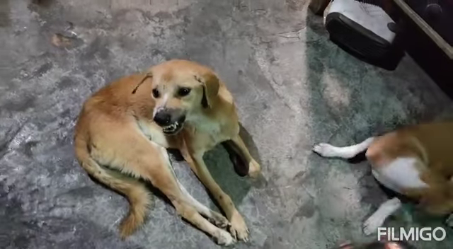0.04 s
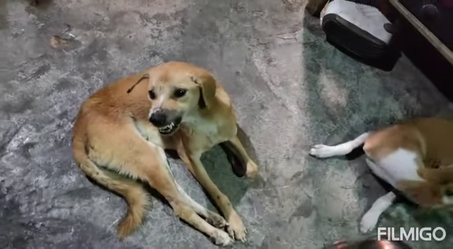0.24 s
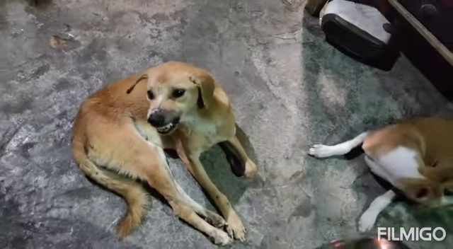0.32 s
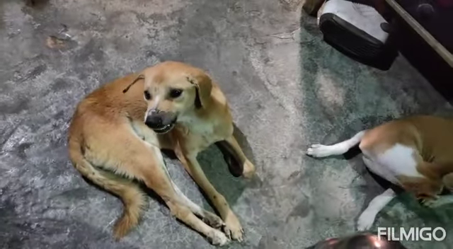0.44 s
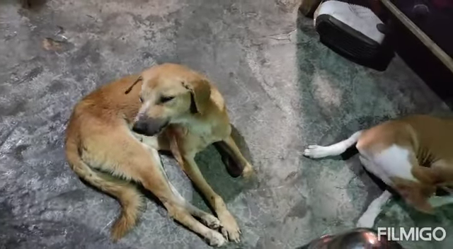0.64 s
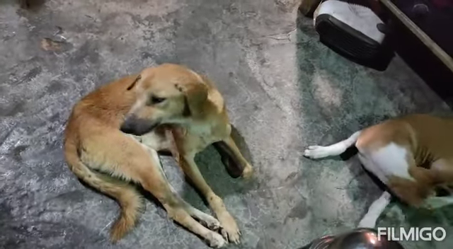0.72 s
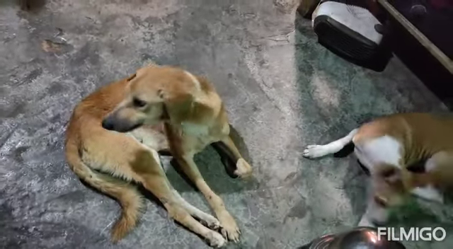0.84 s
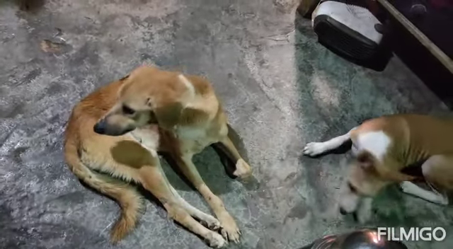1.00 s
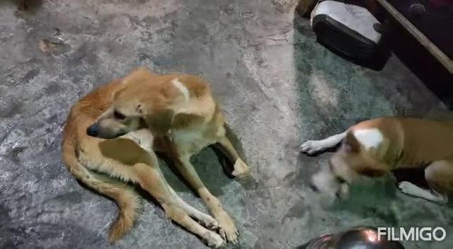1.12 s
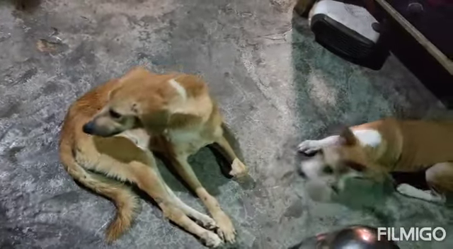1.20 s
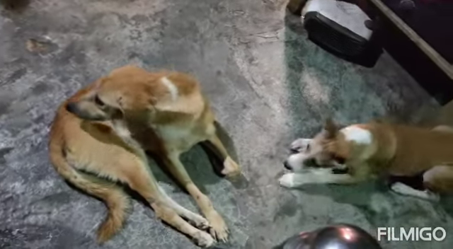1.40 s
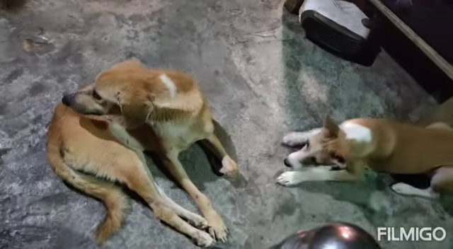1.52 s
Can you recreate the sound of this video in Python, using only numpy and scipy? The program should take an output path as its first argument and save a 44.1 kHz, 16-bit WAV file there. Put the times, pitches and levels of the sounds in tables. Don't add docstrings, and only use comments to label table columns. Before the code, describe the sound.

A dog gives one short, low, rough warning growl close by in a quietly humming room.

```python
import sys
import numpy as np
from scipy import signal
from scipy.fft import rfft, irfft, next_fast_len
from scipy.io import wavfile
from scipy.ndimage import uniform_filter1d, map_coordinates

SR = 44100
rng = np.random.default_rng(int(sys.argv[2]) if len(sys.argv) > 2 else 0)


def output_pcm(signal):
    pcm = np.clip(np.atleast_2d(signal).T, -1, 1) * 32767
    wavfile.write(sys.argv[1], SR, np.round(pcm).astype(np.int16))


def how_loud(loudness_db):
    steps = np.asarray(loudness_db, float) / 20
    return 10 ** steps


N = 68355
HUM_EDGE_HZ = 1009

# (t/s, flap rate/Hz, unevenness/0-1)
FOLD_BEATS = [
    (.245, 70, .02),
    (.28, 78, .03),
    (.33, 127, .1),
    (.58, 123, .08),
    (.655, 92, .03),
    (.73, 88, .03),
    (.75, 79, .05),
    (.81, 77, .04),
    (.82, 66, .04),
]


def unit(x):
    return x / np.sqrt(np.mean(x ** 2) + 1e-20)


def along(points, hz):
    f, v = np.transpose(points)
    return np.interp(np.log(hz + 1), np.log(f + 1), v)


def curves(rows):
    s, *cols = np.transpose(rows)
    return [np.interp(np.arange(N) / SR, s, c) for c in cols]


def ramp(start_s, end_s):
    return np.interp(np.arange(N) / SR, [start_s, end_s], [0, 1])


def wobble(rate):
    return map_coordinates(rng.standard_normal(400), [np.arange(N) * rate / SR])


def filtered(x, response):
    m = next_fast_len(N + SR // 2)
    return irfft(rfft(x, m) * response(np.fft.rfftfreq(m, 1 / SR)), m)[..., :N]


def rings(peaks, power=1):
    def response(f):
        total = 0
        for k, (centre, width, db) in enumerate(peaks):
            peak = 1j * f * width / (centre ** 2 - f * f + 1j * f * width)
            total = total + (-1) ** k * how_loud(db) * peak ** power
        return total
    return response


def rush(response, alike, patchy_db):
    z = signal.stft(rng.standard_normal((2, N + 512)), nperseg=512)[2]
    field = uniform_filter1d(rng.standard_normal(z.shape[1:]), size=5, axis=0)
    field = uniform_filter1d(field, size=12, axis=1)
    pair = signal.istft(z * how_loud(patchy_db * unit(field)), nperseg=512)[1][:, :N]

    def spread(hz):
        turn = np.arccos(np.clip(along(alike, hz), -1, 1)) / 2
        return response(hz) * [np.cos(turn), np.sin(turn)]
    mid, side = filtered(pair, spread)
    return unit(np.array([mid + side, mid - side]))


def whines():
    # (f/Hz, level/dB)
    motors = [(296.1, -76), (371.4, -78), (403.7, -75.5), (484.5, -77), (549.1, -77), (839.8, -79)]
    wander_hz, wander_db = 3, 2.5
    out = 0
    for hz, db in motors:
        phase = 2 * np.pi * np.cumsum(hz + wander_hz * wobble(12)) / SR
        out = out + how_loud(db + 2.5 + wander_db * wobble(9)) * np.sin(phase)
    return out


def room():
    # (f/Hz, density/dB per Hz)
    hum_colour = [(30, -23.5), (45, -5), (110, 1.5), (330, -7.5), (520, -6.5), (680, -9.5), (860, -5.5),
                  (1000, -16.5)]
    # (f/Hz, likeness/0-1)
    hum_alike = [(60, 1), (240, 0.92), (950, 0.48), (3770, 0.011), (15000, 0.06)]
    # (f/Hz, density/dB per Hz)
    hiss_colour = [(1000, -2.5), (1500, 0), (3000, -2.5), (4300, -15), (8000, -10.5), (15600, -30.5)]
    hum_db, drone_db, hiss_db = -60.5, -67, -93
    fall_db = 69.5

    def hum_response(f):
        octaves_above = np.log2(np.maximum(f / HUM_EDGE_HZ, 1))
        return how_loud(along(hum_colour, f) - fall_db * octaves_above)
    hum = rush(hum_response, hum_alike, patchy_db=0.5)
    drone = rush(lambda f: abs(rings([(46, 8, 0)], power=2)(f)), [(46, .985)], patchy_db=-3.5)
    hiss = rush(lambda f: how_loud(along(hiss_colour, f)) * (f > 900), [(2000, 0.18)], patchy_db=-4)
    return how_loud(hum_db + 2.0 * wobble(6.11)) * hum + how_loud(drone_db) * drone + how_loud(hiss_db) * hiss + whines()


def leaks():
    # (t/s, length/s, f/Hz, width/Hz, level/dB)
    openings = [(.02, .25, 2500, 260, -89), (.06, .14, 1532, 110, -87), (0.146, .08, 2180, 430, -82),
                (.065, .07, 4650, 600, -78), (.68, .2, 3750, 500, -83), (.76, .28, 8500, 1100, -91),
                (.82, .1, 5170, 700, -84), (.89, .12, 2550, 350, -88), (.95, .07, 5000, 700, -87),
                (1.04, .08, 1815, 330, -77), (1.045, .07, 1384, 140, -79), (1.032, .13, 3450, 350, -81),
                (1.1, .2, 3200, 260, -83), (1.1, .34, 4800, 300, -87.5), (1.17, .3, 4480, 260, -88),
                (1.2, .12, 1194, 150, -89), (1.26, .1, 2700, 700, -94), (1.4, .07, 2550, 230, -87),
                (1.41, 0.054, 3970, 150, -96), (1.485, .12, 4300, 200, -90)]
    t, out = np.arange(N) / SR, 0
    for s, length, hz, width, db in openings:
        opening = (t - s) / 0.03
        closing = (s + length - t) / (0.4 * length + .02)
        gate = np.clip(np.minimum(opening, closing) + .5, 0, 1) ** 2
        band = rings([(hz, width, 0)], power=3)
        out = out + how_loud(db) * gate * rush(lambda f: abs(band(f)), [(2000, 0.22)], patchy_db=4.5)
    return out * how_loud([[4], [-4]])


def scuffs():
    # (peak t/s, rise/s, fall/s per 20 dB, level/dB, brightness: 5 dB per octave each above 7 kHz; its
    # size also thins the band below 5.5 kHz by 2.3 dB per octave each)
    rubs = [(.1, 0.049, 0.6, -76.5, 2), (0.186, 0.067, 0.14, -65, 0.66), (.28, 0.082, 0.23, -71, -4),
            (0.381, 0.073, 0.15, -60.5, -2.6), (.5, 0.2, 0.2, -71, -8), (0.661, 0.072, 0.15, -71.5, -12),
            (.84, 0.057, 0.12, -79, 0), (.98, 0.051, 0.27, -81.5, 1), (1.064, 0.02, 0.21, -72, 1.53),
            (1.171, 0.049, 0.08, -76.5, -1), (1.279, 0.09, 0.16, -81, 1), (1.439, 0.086, 0.23, -74, 1.5)]
    # (f/Hz, density/dB per Hz)
    fur_colour = [(2500, -46.5), (3800, -18), (4500, -11.5), (6200, -5), (6800, -0.5), (7300, -6),
                  (10000, -15.5), (15600, -27.5)]
    left_db = 6
    t, out = np.arange(N) / SR, 0
    for s, rise, fall, db, bright_db in rubs:
        def colour(f):
            low_loss = 2.3 * abs(bright_db) * (f < 5500) * np.log2(5500 / (f + 1))
            high_gain = 5.0 * bright_db * (f > 7000) * np.log2((f + 1) / 7000)
            return how_loud(along(fur_colour, f) - low_loss + high_gain)
        swell_db = -20 * np.where(t < s, (s - t) / rise, (t - s) / fall) ** 1.75
        grain = rush(colour, [(6000, 0.23)], patchy_db=3.0)
        out = out + how_loud(db + swell_db + 0.9 * wobble(90)) * grain
    return out * how_loud([[left_db / 2], [-left_db / 2]])


def folds():
    scatter_db, slap_s, puff_s = 2.2, .00025, .003
    octave_db, settle_s = 0, .656
    rate_hz, uneven = curves(FOLD_BEATS)
    phase = np.cumsum(rate_hz * (np.arange(N) > .2465 * SR)) / SR
    slip = (phase[round(settle_s * SR)] + .5) % 1 - .5
    phase = phase - slip * ramp(.35, .6)
    at = np.flatnonzero(np.diff(np.floor(phase + 1 - 1e-6)) > 0)
    luck = rng.standard_normal((200, 2))[:len(at)]
    size = how_loud(scatter_db * np.clip(luck[:, 1], -2, 2) * np.clip(10 * uneven[at], .5, 1))
    moved = np.clip(at + luck[:, 0] * uneven[at] * SR / rate_hz[at], 0, N - 1).astype(int)
    flaps = np.bincount(moved, size, N)
    t = np.arange(900) / SR
    gate = signal.fftconvolve(flaps, t * np.exp(-t / puff_s))[:N]
    slap = signal.fftconvolve(flaps, t * np.exp(-t / slap_s))[:N]
    puff = gate * rng.standard_normal(N)
    turn = 2 * np.pi * np.interp(np.arange(N), np.sort(moved), np.arange(len(at)))
    root = np.sin(turn)
    slowness = np.clip((105 - rate_hz) / 15, 0, 1)
    tone = root + how_loud(octave_db) * slowness * np.sin(2 * turn)
    return slap, puff, unit(tone), root


def growl():
    # (t/s, level/dB, nose ring/dB, mouth ring/dB, bare flap tone/dB)
    effort = [
        (.24, -74, -4, -2, -19),
        (.247, -48, 4, -5, 3),
        (.3, -42.5, 2, 1, -5),
        (.56, -44, 0, 0.5, -2),
        (.63, -44.5, -2.5, -1.5, -4),
        (.7, -45.5, -2.5, 6, -10),
        (.77, -46.5, -3, 0, -14),
        (.885, -48.5, -5, -5, -15),
        (.915, -62.5, -8, -10, -15),
    ]
    # (t/s, half length/s, loss/dB, further nose loss/dB)
    catches = [
        (0.333, 0.004, 4.5, 4),
        (0.37, 0.0043, -0.5, 15),
        (.405, .007, 3, 8),
        (0.445, 0.0046, 6, 2.5),
        (0.504, 0.0064, 1, 14),
        (0.549, .005, -1, 7.5),
        (0.588, 0.0094, 7.5, 3),
        (.62, 0.0055, 3, 8),
        (0.815, 0.011, 2.5, 1),
    ]
    # (f/Hz, width/Hz, level/dB)
    chest_full = [(130, 45, -1), (186, 34, -1), (240, 50, -3), (342, 22, 3), (429, 50, -9)]
    # (f/Hz, width/Hz, level/dB)
    chest_sunk = [(125, 40, -9), (188, 44, 1), (260, 60, -7), (341, 20, 7), (432, 60, -11)]
    # (f/Hz, width/Hz, level/dB)
    belly_ring = [(128, 50, 0)]
    # (f/Hz, width/Hz, level/dB)
    nose_rings = [(856, 52, -0.5), (766.3, 66, -4)]
    # (f/Hz, width/Hz, level/dB)
    lips_pursed = [(1960, 260, -2), (2400, 300, -17.5)]
    lips_shut = [(1880, 300, -2), (2348, 240, -2.5), (3300, 300, -18.5)]
    lips_drawn = [(1920, 380, -5.5), (2582, 380, 1), (3310, 500, -12)]
    root_level_db, valley_level_db, upper_level_db = -14, -15, -43
    nose_level_db, mouth_level_db = -4, -20.5
    breathy_nose, breathy_mouth = .28, .7
    mouth_top_hz = 3800

    level_db, nose_db, mouth_db, tone_db = curves(effort)
    slap, puff, tone, root = folds()
    t = np.arange(N) / SR
    loss_db, nose_loss_db = 0, 0
    for s, half, loss, nose_loss in catches:
        dip = np.exp(-((t - s) / half) ** 2)
        loss_db = loss_db + loss * dip
        nose_loss_db = nose_loss_db + nose_loss * dip
    ragged = np.clip(10 * curves(FOLD_BEATS)[1], .65, 1)

    def ring(shape, air):
        struck = np.sqrt(1 - air * ragged) * unit(filtered(slap, shape))
        blown = np.sqrt(air * ragged) * unit(filtered(puff, shape))
        return struck + blown

    def chest_ring(peaks):
        return ring(lambda f: rings(peaks)(f) * rings([(260, 450, 0)], power=2)(f), breathy_nose / 2)

    def mouth_ring(peaks):
        return ring(lambda f: rings(peaks, power=2)(f) * rings([(2500, 1400, 0)], power=2)(f), breathy_mouth)

    def between_ring(hz):
        return ring(rings([(hz, 400, 0)], power=1.67), breathy_mouth)

    def sway():
        return 1.17 * wobble(34.93)

    sinking = ramp(.57, .68)
    chest = (1 - sinking) * chest_ring(chest_full) + sinking * chest_ring(chest_sunk)
    nose = ring(lambda f: rings(nose_rings)(f) * rings([(800, 400, 0)])(f), breathy_nose)
    valley, upper = between_ring(580), between_ring(1120)
    parted, drawn = ramp(0.312, .34), ramp(0.31, 0.69)
    opened = np.sqrt(1 - drawn) * mouth_ring(lips_shut) + np.sqrt(drawn) * mouth_ring(lips_drawn)
    mouth = np.sqrt(1 - parted) * mouth_ring(lips_pursed) + np.sqrt(parted) * opened
    belly = unit(filtered(tone + 0.81 * chest + 1.5 * unit(puff), rings(belly_ring, power=1.8)))
    voice = chest + how_loud(root_level_db) * root + how_loud(tone_db + sway()) * belly
    voice = voice + how_loud(valley_level_db) * valley + how_loud(upper_level_db) * upper
    voice = voice + how_loud(nose_level_db + nose_db - nose_loss_db + sway()) * nose
    voice = voice + how_loud(mouth_level_db + mouth_db + sway()) * mouth

    def head(f):
        hollow = 1 - 0.68 * rings([(1474, 484, 0)])(f)
        return hollow / (1 + 1.4j * f / mouth_top_hz - (f / mouth_top_hz) ** 2) ** 2
    voice = filtered(voice, head)
    ending = how_loud(-600 * np.maximum(t - effort[-1][0], 0))
    return how_loud(level_db - loss_db - 3.0) * voice * (t > effort[0][0]) * ending


def ports(x):
    # (f/Hz, left over right/dB)
    balance = [(60, -2.5), (150, 0.5), (380, -1), (950, -4), (2380, 7.5), (5980, 1), (15000, -11)]
    # (f/Hz, t60/s)
    walls = [(150, .2), (1000, .1), (3000, .075)]
    # (f/Hz, level/dB)
    wall_level = [(200, -21.5), (800, -11), (1300, -4), (2500, -1)]
    lag_s = 0.00013
    turn_s = 0.1217
    side = np.array([[.5], [-.5]])
    direct = filtered(x, lambda f: how_loud(side * along(balance, f)) * np.exp(-2j * np.pi * f * side * lag_s))
    wet = 0
    for k in range(2, 9):
        hz, t, z = signal.stft(rng.standard_normal((2, SR // 6)), SR, nperseg=256)
        tail = signal.istft(z * how_loud(-60 * t / along(walls, hz)[:, None]), SR, nperseg=256)[1]
        tail = tail / np.linalg.norm(tail[0])
        piece = np.sqrt(np.clip(1 - abs(np.arange(N) / SR / turn_s - k), 0, 1))
        wet = wet + signal.fftconvolve(direct * piece, tail, axes=1)[:, :N]
    return direct + filtered(wet, lambda f: how_loud(along(wall_level, f)))


def scene():
    return room() + leaks() + scuffs() + ports(growl())


def suppress(x):
    # (f/Hz, level/dB)
    threshold = [(1000, -124), (2500, -122), (3700, -117), (4400, -103), (5000, -105), (5700, -118),
                 (9500, -114), (15000, -119)]
    # (t/s, length/s, low f/Hz, high f/Hz)
    closures = [
        (.45, .36, 4300, 5150),
        (.44, .2, 8900, 12000),
        (.66, .12, 7500, 8300),
        (.59, .08, 3400, 4200),
        (.875, .06, 5800, 7500),
        (.9, .12, 2950, 4300),
        (1.3, .2, 4900, 5500),
    ]
    shut_db = -22
    sparse = .8
    hz, t, z = signal.stft(x, SR, nperseg=2048)
    for s, length, low_hz, high_hz in closures:
        inside = np.outer((hz > low_hz) & (hz < high_hz), (t > s) & (t < s + length))
        z = z * how_loud(shut_db * inside)
    power = abs(z) ** 2
    band = abs(uniform_filter1d(uniform_filter1d(power, size=14, axis=1), size=2, axis=2))
    limit = how_loud(2 * along(threshold, hz))[:, None] * (hz > HUM_EDGE_HZ)[:, None]
    band_open = band ** 3 / (band ** 3 + limit ** 3 + 1e-90)
    line_limit = limit + sparse * band * (hz > 3800)[:, None]
    line_open = power ** 2 / (power ** 2 + line_limit ** 2 + 1e-60)
    return signal.istft(z * (band_open * line_open), SR, nperseg=2048)[1][:, :N]


def top_cut(x):
    return signal.sosfilt(signal.butter(12, 15670, fs=SR, output="sos"), x)


def record(dry):
    converter_hiss = how_loud(-104) * rng.standard_normal(dry.shape)
    return top_cut(suppress(dry) + converter_hiss)


dry = scene()
out = record(dry)
output_pcm(out)
```